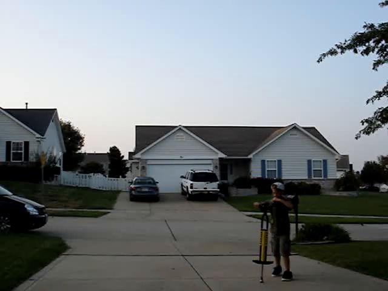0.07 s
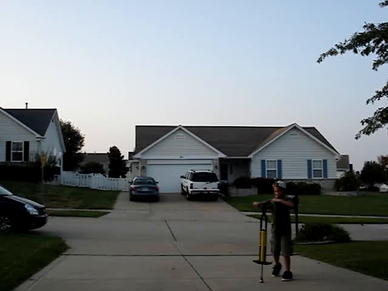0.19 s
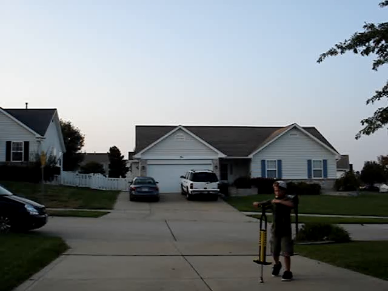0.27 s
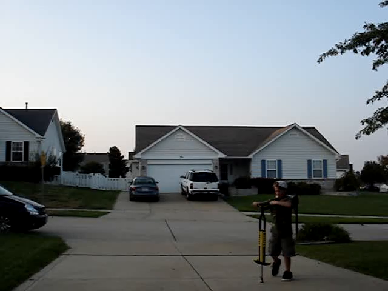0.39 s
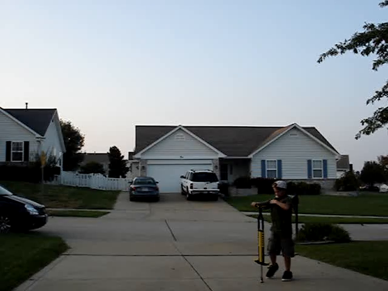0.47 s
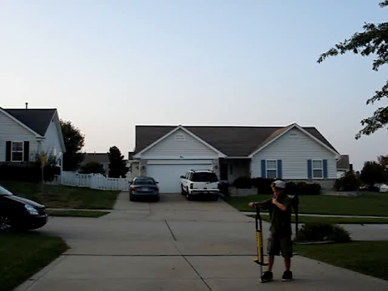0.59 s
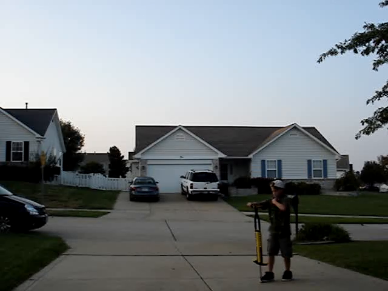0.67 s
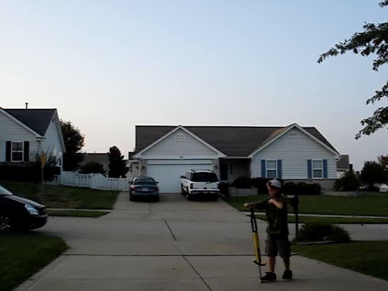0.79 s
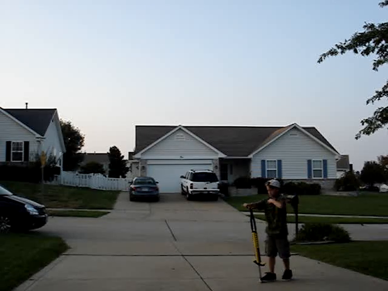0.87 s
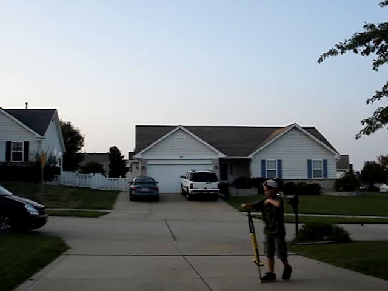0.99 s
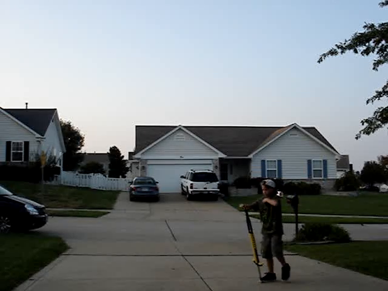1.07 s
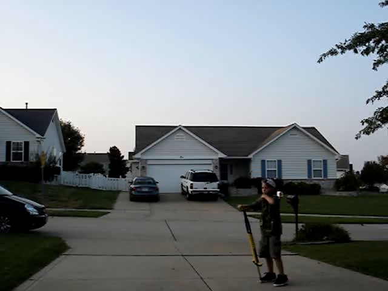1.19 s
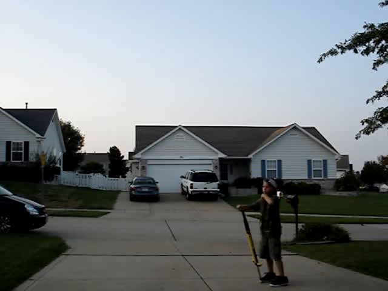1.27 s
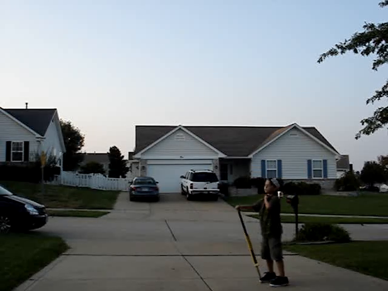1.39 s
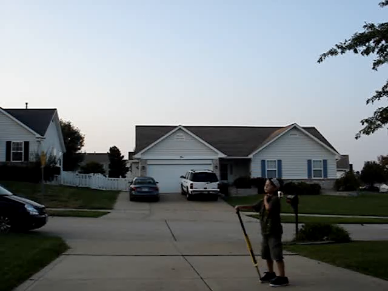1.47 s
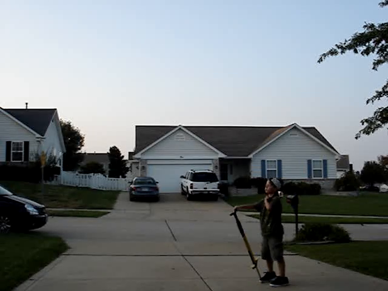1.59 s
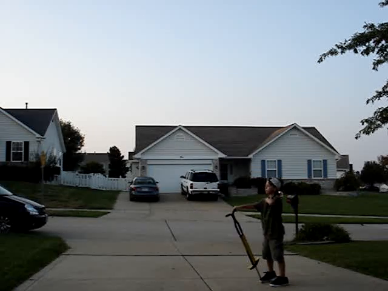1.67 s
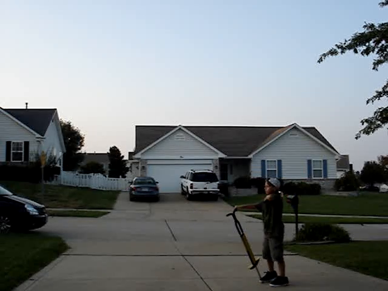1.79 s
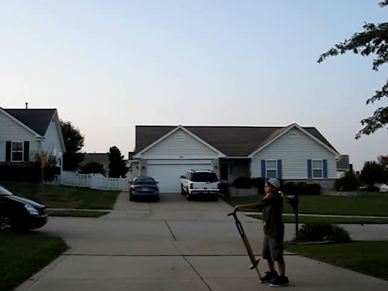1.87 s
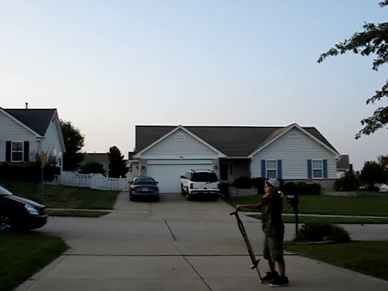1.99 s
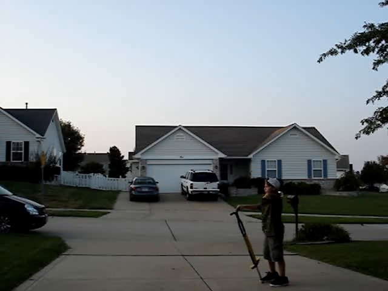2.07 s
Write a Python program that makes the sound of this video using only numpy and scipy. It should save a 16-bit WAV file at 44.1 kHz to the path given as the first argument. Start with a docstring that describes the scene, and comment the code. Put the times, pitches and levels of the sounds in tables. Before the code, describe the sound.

Sharp metallic knocks of a pogo stick on concrete outdoors, brief scrapes, then fainter clicks

```python
"""A concrete driveway, where a pogo stick is knocked about: its foot strikes, its steel shaft and pegs clack.
Each contact is a crack of noise, its reflections from hard nearby walls, and the stick's ringing modes.
The spring chatters as showers of tiny contacts; shoes scuff and the spring scrapes as swelling coloured noise.
The overloaded microphone thumps at loud blows; underneath lie a faint machine hum, outdoor air and hiss.
A small mono camera turns its gain down at the loudest blows."""
import sys
import numpy as np
from scipy import signal
from scipy.fft import rfft, irfft, next_fast_len
from scipy.io import wavfile
from scipy.ndimage import map_coordinates

SR = 44100
rng = np.random.default_rng(int(sys.argv[2]) if len(sys.argv) > 2 else 0)


def inscribe(sig):
    """Save sig as 16-bit PCM at rate SR to the path in sys.argv[1].

    A 1-D sig is mono; a 2-D sig holds one channel per row.
    Samples are clipped to [-1, 1] before scaling.
    """
    pcm = np.round(np.clip(np.atleast_2d(sig).T, -1, 1) * 32767)
    wavfile.write(sys.argv[1], SR, pcm.astype(np.int16))


N = 92610
T = np.arange(N) / SR  # seconds

# Contacts of the stick. Each row: start in seconds, level in dB, bass shelf in dB, emphasis centre in Hz,
# emphasis width in octaves, emphasis in dB, treble shelf in dB, ringing in dB, reflections in dB,
# hardness of the first touch in dB.
CONTACTS = [(0.024, -31.5, 23.5, 800, 0.21, 10, 0.5, -6.5, -9.5, -4),
            (0.239, -14.5, 6.5, 616, 0.34, 15.5, 5, -7.5, -4, 16.5),
            (0.251, -17.5, 7.5, 775, 0.81, 6.5, 1, -2.5, 0, 15),
            (0.274, -16, 13.5, 640, 1, 8, -17, -31, -9, 16.5),
            (0.296, -19.5, -6, 1810, 0.37, 12, 6.5, -11, -11.5, 18),
            (0.316, -29.5, -7, 1500, 0.41, 3, -15, -5, -6, 11),
            (0.514, -25, 3, 790, 0.36, 4, -1, -2, -8.5, 9),
            (0.5832, -12, 0.5, 644, 0.32, 10.5, 0.5, -9, 0, 19),
            (0.592, -14, 0, 2430, 0.54, 16, -4, -19.5, 3, 6),
            (0.608, -21, 1, 800, 0.21, 3.5, -0.5, 2, 7.5, -8),
            (0.875, -11.5, -4, 570, 0.28, 9, -5, 0.5, -2.5, 13),
            (0.89, -16, -13, 1686, 0.23, 14, 0, 3.5, -4, 0),
            (0.906, -17, -20, 1750, 0.1, 10, 1.5, 5.5, 6, 0),
            (0.925, -16.5, 0, 1590, 0.47, 6.5, 3.5, 3, 0.5, -3),
            (1.217, -25, -1.5, 1850, 0.38, 4.5, -7, -12.5, -2, 2),
            (1.433, -31.5, -8, 624, 0.15, 9.5, -3.5, -0.5, -5.5, 18),
            (1.8164, -24.5, 6.5, 900, 0.27, 2.5, -1.5, -4.5, -4, 19.5),
            (1.8211, -20, -3, 2750, 0.93, 13, -5.5, -20, -12.5, 2),
            (2.092, -30, 14.5, 715, 0.25, 9.5, -20, -2.5, -1.5, 8)]
# Ringing modes of the stick. Each row: frequency in Hz, relative level in dB.
STICK_MODES = [(494, -7), (560, -5), (624, -4), (734, -4), (786, -4), (895, -5), (938, -8), (1451, -7),
               (1513, -1), (1577, -8), (1605, -5), (1661, -6), (1759, -1), (1908, -6), (2106, -6),
               (2425, -6)]
# Colour of a blow, shared with the rattles. Each row: frequency in Hz, relative density in dB per Hz.
BLOW_COLOUR = [(30, -26), (100, -21.5), (190, -10.5), (560, -3), (1100, -0.5), (2300, -6), (3200, -12.5),
               (7000, -21.5), (10000, -29.5)]
CRACK_T60_S, CRACK_DB = 0.026, 4
RING_T60_S, RING_ATTACK_S = 0.24, 0.00085
RING_BLUR = 1.6  # random phase drift, radians per root second
BASS_HZ, TREBLE_HZ = 410, 3380  # shelf corners


def clacks():
    """Each contact is a crack, its reflections and the stick's ringing, coloured by where it strikes."""
    out = np.zeros(N)
    for (start, level_db, bass_db, peak_hz, octaves, peak_db, treble_db,
         ring_db, wall_db, strike_db) in CONTACTS:
        def touch(hz):
            """Tone of this striking place in dB: a bell, a bass shelf and a treble shelf."""
            bell = peak_db * emphasis(hz, peak_hz, octaves)
            bass = bass_db / (1 + (hz / BASS_HZ) ** 4)
            treble = treble_db * (1 - 1 / (1 + (hz / TREBLE_HZ) ** 4))
            return bell + bass + treble

        reflections = amp(wall_db) * walls()
        t = T[:len(reflections)]
        crack = amp(CRACK_DB) * decay(t, CRACK_T60_S) * rng.standard_normal(len(t))
        crack[0] += amp(strike_db)  # a single-sample click for the first touch
        colour = causal(lambda hz: along(BLOW_COLOUR, hz) + touch(hz))
        blow = signal.fftconvolve(crack + reflections, colour)[:len(t)]

        ring = np.zeros(len(t))
        for hz, mode_db in STICK_MODES:
            drift = RING_BLUR * np.cumsum(rng.standard_normal(len(t))) / np.sqrt(SR)
            phase = rng.uniform(0, 2 * np.pi) + drift
            # taking off peak_db leaves a mode at the bell's centre unboosted by it
            mode_gain = amp(mode_db + touch(hz) - peak_db)
            ring += mode_gain * np.sin(2 * np.pi * hz * t + phase)
        ring *= decay(t, RING_T60_S) * (1 - np.exp(-t / RING_ATTACK_S))

        add(out, start, amp(level_db) * (blow + amp(ring_db) * ring))
    return out


# Chatter of the spring after a contact. Each row: start in seconds, rise in seconds, fall by 40 dB in seconds,
# level in dB before reflections, resonance centre in Hz, resonance width in octaves.
CHATTERS = [(0.514, 0.0076, 0.045, -29.5, 2960, 0.73), (0.587, 0.029, 0.25, -18.5, 2670, 1),
            (0.876, 0.024, 0.22, -20.5, 1790, 0.2)]
RATTLE_PER_S, RATTLE_PEAK_DB = 1500, 25.5  # mean rate of ticks, boost of the resonance


def rattles():
    """The spring chatters in its tube: tiny contacts, each chatter with its own resonance, narrow or broad."""
    out = np.zeros(N)
    for start, rise, fall, level_db, centre_hz, octaves in CHATTERS:
        ticks = (rng.random(N) < RATTLE_PER_S / SR) * rng.standard_normal(N)
        tube = causal(lambda hz: along(BLOW_COLOUR, hz) + RATTLE_PEAK_DB * emphasis(hz, centre_hz, octaves))
        chatter = unit(signal.fftconvolve(ticks, tube)[:N])
        out += stroke(start, rise, fall, level_db) * chatter
    return answered(out)


# Low thump of the overloaded microphone at loud blows. Each row: start in seconds, level in dB.
OVERLOAD_THUMPS = [(0.239, -32.5), (0.272, -40), (0.585, -24), (0.875, -43)]
THUMP_S = 0.0087  # time scale of the pulse


def overload_thumps():
    """The overloaded microphone thumps at loud blows: one low pulse that swings up, then below zero."""
    out = np.zeros(N)
    u = T / THUMP_S
    pulse = 2 * u * (2 - u) * np.exp(-u)
    for start, level_db in OVERLOAD_THUMPS:
        add(out, start, amp(level_db) * pulse)
    return out


# Shoes dragging on concrete. Each row: start in seconds, rise in seconds, fall by 40 dB in seconds,
# level in dB before reflections.
SCUFF_STROKES = [(0.35, 0.1, 0.65, -35.5), (0.44, 0.044, 0.41, -31), (0.508, 0.0043, 0.05, -25),
                 (1.145, 0.011, 0.046, -30.5)]
# Colour of a scuff. Each row: frequency in Hz, relative density in dB.
SCUFF_COLOUR = [(40, -39), (450, -0.5), (750, 3), (1100, -12.5), (1800, -11), (3000, -27), (10000, -43.5)]


def scuffs():
    """Shoes drag on concrete: gritty noise, strongest in the low mids."""
    return friction(SCUFF_STROKES, SCUFF_COLOUR)


# The spring and shaft sliding. Each row: start in seconds, rise in seconds, fall by 40 dB in seconds,
# level in dB before reflections.
SCRAPE_STROKES = [(0.33, 0.038, 0.39, -45.5), (0.733, 0.014, 0.13, -23.5), (1.15, 0.0082, 0.042, -43.5),
                  (1.325, 0.025, 0.049, -40.5)]
# Colour of a scrape. Each row: frequency in Hz, relative density in dB.
SCRAPE_COLOUR = [(200, -16), (700, 4.5), (1500, 1), (2600, -12), (3600, 1.5), (4600, -8), (7500, -10),
                 (10000, -17.5)]


def scrapes():
    """The spring and shaft slide: gritty noise with a brighter colour."""
    return friction(SCRAPE_STROKES, SCRAPE_COLOUR)


GRIT = 0.2  # depth of the roughness


def friction(strokes, colour):
    """Gritty rubbing that swells and dies with each stroke, answered by the walls."""
    force = sum(stroke(*row) for row in strokes)
    rubbing = unit(noise(colour) * np.exp(GRIT * wobble(500)))
    return answered(force * rubbing)


# How the walls die away. Each row: frequency in Hz, time to fall by 60 dB in seconds.
WALL_T60 = [(150, 0.62), (550, 0.36), (1500, 0.43), (9000, 0.31)]
WALL_BUILD_S, WALL_LUMP, WALL_WET = 0.0015, 0.22, 0.68  # build-up time, lumpiness, wet gain


def walls():
    """A fresh tail of reflections: builds up quickly, is lumpy, and dies band by band."""
    n = SR * 3 // 4
    hz, t, bands = signal.stft(rng.standard_normal(n), SR, nperseg=256)
    bands = bands * decay(t, along(WALL_T60, hz)[:, None])
    tail = signal.istft(bands, SR, nperseg=256)[1][:n]
    build = 1 - np.exp(-T[:n] / WALL_BUILD_S)
    lumps = np.exp(WALL_LUMP * wobble(340.2)[:n] - WALL_LUMP ** 2)
    return tail * build * lumps


def answered(dry):
    """A sound with its reflections from the walls."""
    tail = walls()
    tail = tail / np.linalg.norm(tail)
    return dry + WALL_WET * signal.fftconvolve(dry, tail)[:N]


# Colour of the outdoor air. Each row: frequency in Hz, relative density in dB per Hz.
AIR_COLOUR = [(20, -29), (130, -11.5), (200, -4), (560, 1), (760, 3), (1050, -6), (2000, -7), (2800, -15.5),
              (10000, -27.5)]
# Level of the air over time. Each row: time in seconds, level in dB before its small waver.
AIR_LEVEL = [(0, -38.5), (.2, -41), (.7, -51.5), (1.05, -36), (1.55, -44), (2.1, -42)]
AIR_WAVER_DB = 0.7


def air():
    """Outdoor air: coloured noise whose level drifts and wavers."""
    level_db = np.interp(T, *np.transpose(AIR_LEVEL)) + AIR_WAVER_DB * wobble(13.31)
    return noise(AIR_COLOUR) * amp(level_db)


# Tones of the machine. Each row: centre frequency in Hz, level in dB before its waver, scale of pitch wander in Hz.
HUM_TONES = [(105.3, -54, 1.28), (207.5, -52, 0.976), (7900, -62, 32)]
HUM_WAVER_DB = 1.5


def hum():
    """A machine's tones, low hum and high whine, slightly unsteady in pitch and level."""
    out = np.zeros(N)
    for hz, level_db, width in HUM_TONES:
        level = amp(level_db + HUM_WAVER_DB * wobble(19))
        pitch = hz + width * wobble(6 * width)
        out += level * np.sqrt(2) * np.sin(2 * np.pi * np.cumsum(pitch) / SR)
    return out


HISS_DB = -61.5


def hiss():
    """The microphone's even white noise."""
    return amp(HISS_DB) * rng.standard_normal(N)


def amp(db):
    """Decibels to gain."""
    return 10 ** (np.asarray(db) / 20)


def unit(x):
    """Scale to rms 1."""
    return x / np.sqrt(np.mean(x ** 2) + 1e-20)


def along(points, hz):
    """Read (Hz, value) points on a log axis."""
    f, v = np.transpose(points)
    return np.interp(np.log(hz + 1), np.log(f + 1), v)


def emphasis(hz, centre_hz, octaves):
    """A bell of height 1 on a log-frequency axis."""
    return np.exp(-.5 * (np.log2((hz + 1) / centre_hz) / octaves) ** 2)


def decay(t, t60):
    """Exponential decay that falls by 60 dB in t60 seconds."""
    return np.exp(-np.log(1000) * t / t60)


def stroke(start, rise, fall, level_db):
    """Force that swells from its start, then dies by 40 dB over the fall time."""
    swell = np.clip((T - start) / rise, 0, 1)
    dying = np.exp(-np.log(10) * np.maximum(T - start - rise, 0) / (fall / 2))
    return amp(level_db) * swell * dying


def wobble(rate):
    """A smooth random curve, rate knots a second."""
    knots = rng.standard_normal(int(N * rate / SR) + 4)
    return map_coordinates(knots, [T * rate])


def filtered(x, response):
    """x times a response of frequency."""
    m = next_fast_len(N + SR // 2)
    return irfft(rfft(x, m) * response(np.fft.rfftfreq(m, 1 / SR)), m)[:N]


def noise(colour):
    """Coloured noise of rms 1."""
    return unit(filtered(rng.standard_normal(N), lambda hz: amp(along(colour, hz))))


def causal(colour, size=4096):
    """Minimum-phase impulse response of energy 1 for a colour given in dB."""
    cepstrum = irfft(np.log(amp(colour(np.fft.rfftfreq(size, 1 / SR)))))
    cepstrum[1:size // 2] *= 2  # fold so the energy comes early
    cepstrum[size // 2 + 1:] = 0
    h = irfft(np.exp(rfft(cepstrum)))
    return h / np.linalg.norm(h)


def add(out, start, x):
    """Mix x into out from a start in seconds."""
    i = max(0, round(start * SR))
    out[i:i + len(x)] += x[:max(0, N - i)]


def scene():
    """Everything reaches one microphone, which adds its own thumps and hiss."""
    stick = clacks() + rattles()
    rubbing = scuffs() + scrapes()
    background = air() + hum() + hiss()
    mono = stick + overload_thumps() + rubbing + background
    return np.array([mono, mono])


GAIN_LIMIT_DB, GAIN_ATTACK_S, GAIN_RELEASE_DB_PER_S = -16, 0.0051, 16


def gain_control(x):
    """Turns down quickly when the sound is loud and recovers slowly."""
    k = np.exp(-1 / (GAIN_ATTACK_S * SR))
    power = signal.lfilter([1 - k], [1, -k], x ** 2)
    excess_db = np.maximum(10 * np.log10(power + 1e-12) - GAIN_LIMIT_DB, 0)
    # a running maximum on a rising ramp makes each cut recover at a steady rate
    recovery = GAIN_RELEASE_DB_PER_S * T
    cut_db = np.maximum.accumulate(excess_db + recovery) - recovery
    return x * amp(-signal.lfilter([1 - k], [1, -k], cut_db))


CLIP_TOP, CLIP_KNEE = 0.6, 4  # ceiling in full scale, sharpness of the bend
TOP_HZ = 10160  # nothing passes above this


def record(dry):
    """The camera ducks after loud blows, rounds off peaks and keeps nothing above its band limit."""
    x = gain_control(dry.mean(axis=0))
    soft = x / (1 + np.abs(x / CLIP_TOP) ** CLIP_KNEE) ** (1 / CLIP_KNEE)
    mono = filtered(soft, lambda hz: np.clip((TOP_HZ - hz) / 150, 0, 1))  # 150 Hz slope
    return np.array([mono, mono])


dry = scene()
out = record(dry)
inscribe(out)
```